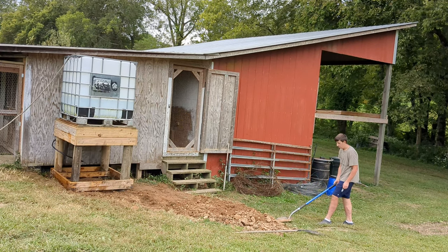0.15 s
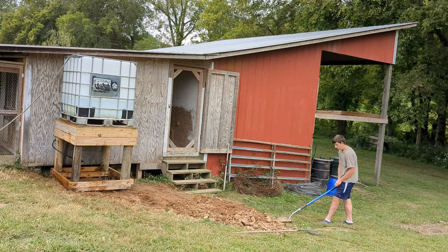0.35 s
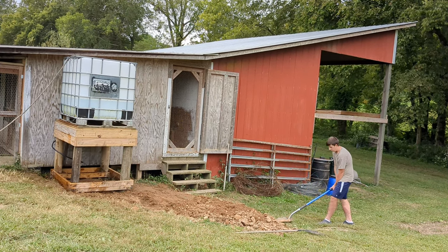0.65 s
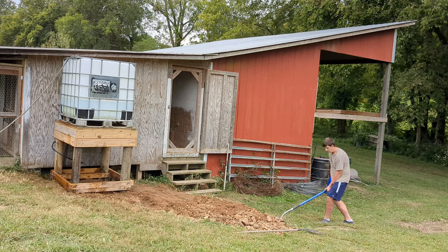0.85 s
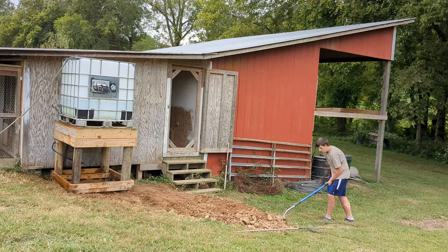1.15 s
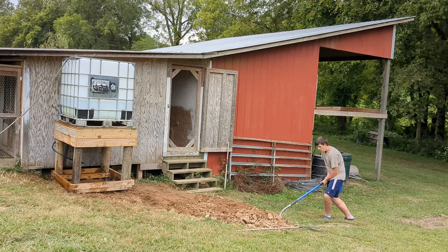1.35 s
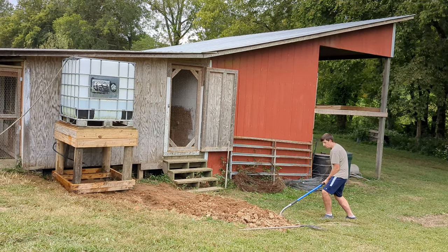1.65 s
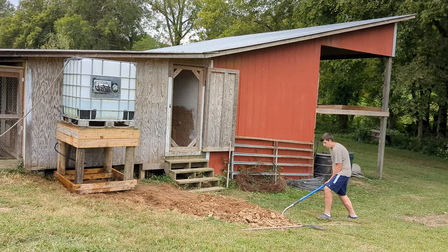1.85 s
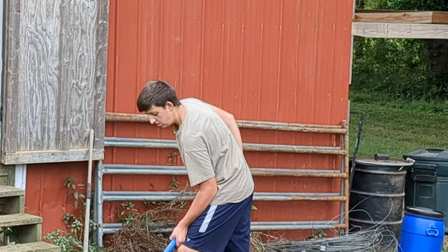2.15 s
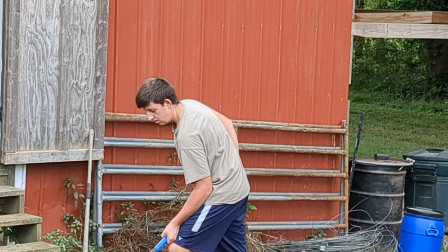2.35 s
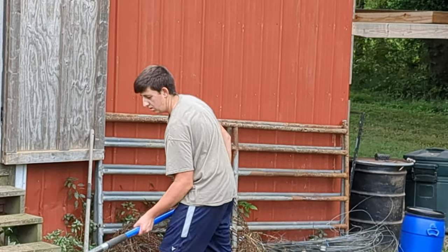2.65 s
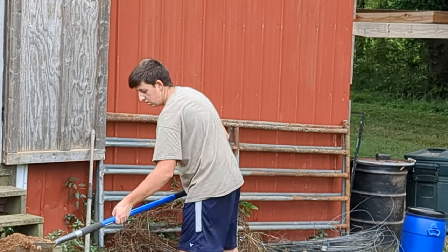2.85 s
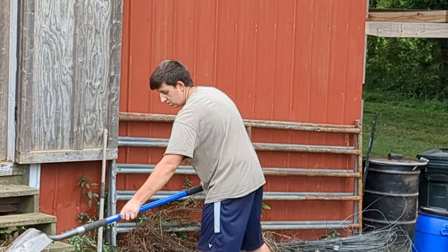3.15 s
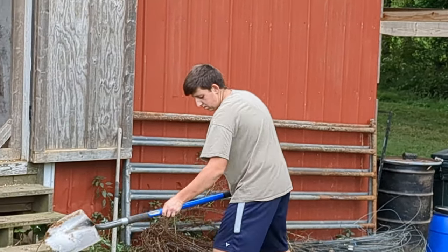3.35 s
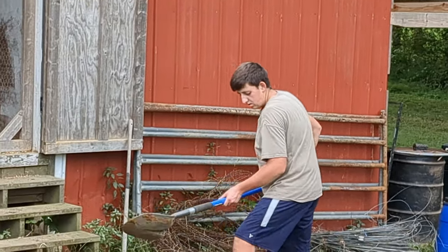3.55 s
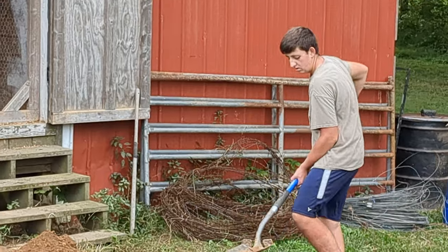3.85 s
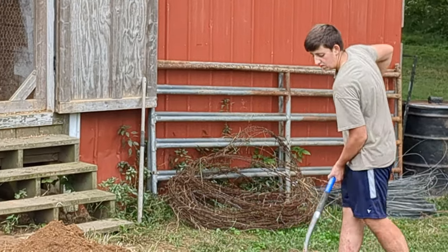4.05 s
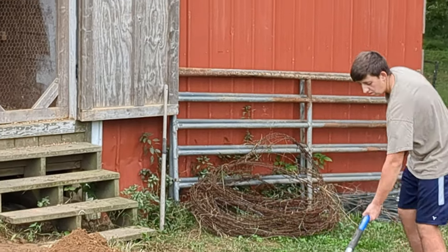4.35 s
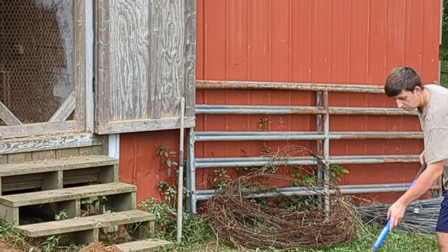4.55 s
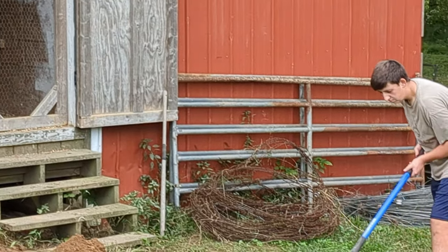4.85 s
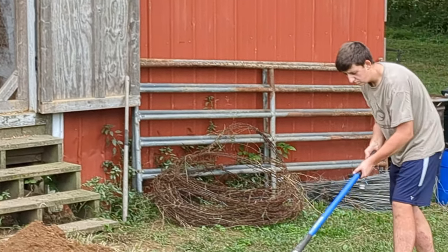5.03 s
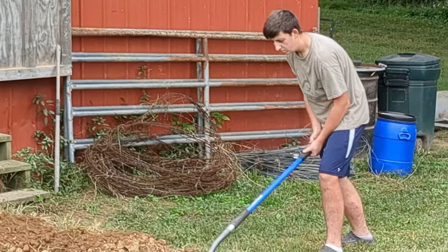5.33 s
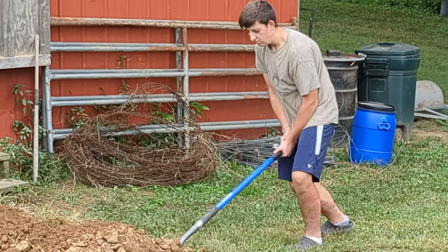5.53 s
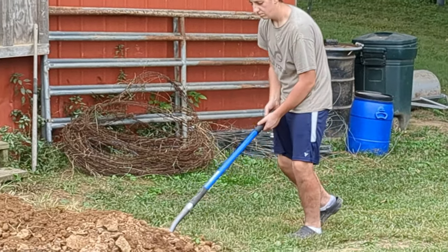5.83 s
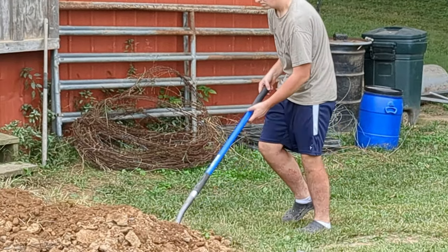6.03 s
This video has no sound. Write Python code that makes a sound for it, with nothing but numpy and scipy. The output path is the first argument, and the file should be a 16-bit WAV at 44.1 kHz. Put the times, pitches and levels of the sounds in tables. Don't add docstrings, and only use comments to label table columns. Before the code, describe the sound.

Two takes of shovelling in open air, picked up by a small, slightly dull camera microphone. The first is quiet and distant, with short gritty scrapes, small stone ticks, low traffic rumble and faint bird and hen notes. A momentary dropout follows, then a louder take with humming engine, pulsing insect chirps, loose soil hissing off the blade, one hard clank and several crunching scrapes.

```python
import sys
import numpy as np
from scipy import signal
from scipy.fft import rfft, irfft
from scipy.io import wavfile
from scipy.ndimage import uniform_filter1d

SR = 44100
rng = np.random.default_rng(int(sys.argv[2]) if len(sys.argv) > 2 else 0)


def materialize(psi):
    bounded = np.clip(np.atleast_2d(psi).T, -1, 1)
    quanta = np.round(bounded * 32767).astype(np.int16)
    wavfile.write(sys.argv[1], SR, quanta)


def rack_gain(trim_db):
    fader = np.asarray(trim_db, float)
    return 10 ** (fader / 20)


N = 272979
TIME = np.arange(N) / SR
GAP_S = (2.1077, 2.198)
SECOND = TIME > np.mean(GAP_S)


def per_take(first, second):
    return np.where(SECOND, second, first)


def evened(x):
    return x / np.sqrt(np.mean(x ** 2) + 1e-20)


def read(points, hz):
    f, value = np.transpose(points)
    return np.interp(np.log(hz + 1), np.log(f + 1), value)


def column(table, order):
    rows = np.array(table)
    return np.interp(TIME, rows[:, 0], rows[:, order])


def resonate(x, hz, width):
    turn = np.exp(2j * np.pi * np.cumsum(hz * np.ones(x.shape[-1])) / SR)
    r = np.exp(-np.pi * width / SR)
    return 2 * (turn * signal.lfilter([(1 - r) ** 2], [1, -2 * r, r * r], x / turn)).real


# frequency in Hz, likeness of left and right (1 = identical).
LIKENESS = [(60, 0.97), (130, 0.95), (290, 0.89), (640, 0.4), (1400, -0.12), (3080, -0.081), (6770, 0.097),
            (14900, -0.05)]
# frequency in Hz, left minus right in dB.
LEFT_TILT = [(60, 1.7), (130, 1.6), (290, 1.3), (640, 1.6), (1400, 2.9), (3080, 3.7), (6770, 8.3),
             (14900, 4.3)]


def field(spectrum, lo_hz=1, hi_hz=20000):
    hz = np.fft.rfftfreq(N, 1 / SR)
    left, other = rfft(rng.standard_normal((2, N)))
    same = np.clip(read(LIKENESS, hz), -1, 1)
    right = same * left + np.sqrt(1 - same ** 2) * other
    tilt = rack_gain(read(LEFT_TILT, hz) / 2)
    high_pass = (hz + 1) ** 4 / ((hz + 1) ** 4 + lo_hz ** 4)
    low_pass = hi_hz ** 4 / (hz ** 4 + hi_hz ** 4)
    pair = np.array([left * tilt, right / tilt])
    out = irfft(pair * rack_gain(read(spectrum, hz)) * high_pass * low_pass, N)
    return out / out.mean(0).std()


def flutter(rate_hz, depth_db):
    steps = rng.standard_normal(int(N / SR * 200) + 2)
    return rack_gain(depth_db * np.interp(TIME * min(rate_hz, 199), np.arange(len(steps)), steps))


def swell(s, rise, fall, db, round_top=1.12):
    away = np.where(TIME < s, (s - TIME) / max(rise, .005), (TIME - s) / max(fall, .005))
    return rack_gain(2 * (db - 20 * np.minimum(away, 5) ** round_top))


def ring(s, db, hz, t60, rise=0.00044):
    t60 = max(t60, .004)
    out, first = np.zeros(N), int(s * SR) + 1
    t = TIME[first:first + int(1.5 * t60 * SR)] - s
    onset = np.minimum(t / max(rise, .0001), 1)
    out[first:first + len(t)] = rack_gain(db - 60 * t / t60) * np.sin(2 * np.pi * hz * t) * onset
    return out


def place(x, left_db, lag=0, wet_db=-8):
    t = np.arange(3000) / SR
    sparse = rng.random((2, len(t))) < .05
    scatter = rng.standard_normal((2, len(t))) * sparse * rack_gain(-60 * t / 0.035)
    scatter *= rack_gain(wet_db) / np.linalg.norm(scatter[0])
    scatter[0, 0], scatter[1, lag] = 1, 1
    pan = rack_gain([[left_db / 2], [-left_db / 2]])
    return signal.oaconvolve(x[None], scatter * pan, axes=1)[:, :N]


def nearer_right_port(x):
    return np.array([np.pad(x, (17, 0))[:N], x]) * rack_gain([[.6], [-.6]])


# frequency in Hz, density in dB per Hz.
RUMBLE = [
    [(12, -75), (20, -17.5), (59, -14.5), (112, -9.5), (144, -18.5), (216, -23), (381, -25), (407, -32),
     (446, -23), (768, -32.5), (861, -32), (942, -32.5), (1660, -43), (4500, -78), (5850, -93),
     (9900, -120)],
    [(12, -44), (20, -14.5), (32, -12), (71, -6.5), (123, -3.5), (216, -18.5), (277, -17), (310, -20),
     (381, -23.5), (446, -23), (511, -25.5), (627, -24), (1700, -43.5), (4500, -60.5), (5850, -100),
     (9900, -120)],
]
# time in seconds, dB over its usual level.
TRAFFIC = [(0, 0.5), (.3, 0.5), (1.0, -1), (1.1, 0), (2.05, 1.5), (2.3, 0.5), (2.5, -4), (3.05, 2.5),
           (3.3, -1), (3.52, 4.5), (3.87, -2), (4.07, 4), (4.24, 1.5), (4.4, 3.5), (4.8, 0.5), (5.7, -1),
           (5.9, -0.5), (6.19, 0)]
BASS_DB = [-55, -46.5]
ROAR_DB = [-68, -53.5]


def rumble():
    bass = per_take(field(RUMBLE[0], hi_hz=147.0), field(RUMBLE[1], hi_hz=142))
    roar = per_take(field(RUMBLE[0], lo_hz=145), field(RUMBLE[1], lo_hz=146.6))
    traffic_db = column(TRAFFIC, order=1)
    sink_db = 0.42 * (TIME - per_take(1.05, 4.2))
    roar_db = per_take(*ROAR_DB) + .25 * traffic_db - sink_db
    return bass * rack_gain(per_take(*BASS_DB) + traffic_db) + roar * rack_gain(roar_db) * flutter(14, 1.5)


# start and end in seconds, pitch in Hz, width in Hz, level in dB.
DRONES = [(0, 0.967, 107.1, 3.2, -56.5), (0, 0.946, 71.4, 3.2, -62), (0, .6, 220.5, 2.6, -70.5),
          (1.11, 2.12, 113.3, 4.6, -62), (2.2, 4.42, 71.1, 2.6, -53.5), (2.216, 4.6, 96.6, 6.2, -57),
          (2.295, 5, 191.2, 2.4, -64), (2.75, 5.4, 323.2, 3, -65.5), (2.75, 3.75, 302, 3, -63),
          (4.0, 6.0, 276.4, 1.8, -66), (4.986, 5.899, 85.3, 5.3, -49.5), (4.19, 4.904, 883.6, 3.6, -66.5)]


def drones():
    out = np.zeros(N)
    for start, end, hz, width, db in DRONES:
        fade = np.clip(np.minimum(TIME - start, end - TIME) / 0.12 + .5, 0, 1)
        fuzz = evened(resonate(rng.standard_normal(N), hz, width))
        hum = evened(fuzz + 2.7 * np.sin(2 * np.pi * hz * TIME))
        out += rack_gain(db) * fade * hum
    return nearer_right_port(out)


# frequency in Hz, density in dB per Hz.
CHORUS = [(2060, -10.5), (3500, -11), (4290, -15.5), (5040, -14), (5460, -15.5), (5880, -16.5), (6740, -4),
          (7170, -1.5), (7530, -6), (9010, -15), (10100, -16.5), (13000, -14.5), (14100, -22.5),
          (14900, -11), (15300, -11)]
CHORUS_DB = [-80.5, -75]


def far_chorus():
    return field(CHORUS) * rack_gain(per_take(*CHORUS_DB) + per_take(0.6, 0.63)) * flutter(16, 1.0)


def buzzer():
    pulses = np.sin(np.pi * np.cumsum(69 * flutter(12, 0.8)) / SR) ** 8
    buzz = rng.standard_normal((2, N)) * pulses
    buzz = buzz[0] + 0.78 * buzz
    return evened(resonate(buzz, 7350, 1100)) * rack_gain(per_take(-88, -83) + np.array([[4.2], [-4.2]]))


TRILLS = [
    (5605, 260, -99, -95),
    (8170, 120, -89.5, -103),
]


def trills():
    out = np.zeros((2, N))
    for hz, width, first_db, second_db in TRILLS:
        trill = evened(resonate(rng.standard_normal((2, N)), hz, width)) * flutter(30, 1.0)
        out += trill * rack_gain(per_take(first_db, second_db) + np.array([[4.5], [0]]))
    return out


# loudest moment in seconds, level in dB.
CHIRPS = [(.21, -85), (.51, -87), (.8, -83.5), (1.03, -81.5), (1.42, -80), (1.69, -82.5), (2.01, -80),
          (2.36, -71.5), (2.64, -72.5), (2.95, -73), (3.29, -74.5), (3.6, -77), (3.931, -77), (4.25, -75.5),
          (4.52, -72), (4.85, -78), (5.14, -76.5), (5.51, -78), (5.86, -77), (6.15, -74.5)]
# frequency in Hz, width in Hz, level in dB.
WINGS = [
    (6940, 203, -1.5),
    (6700, 210, -7.5),
    (7340, 190, -11),
    (7600, 900, -19),
]


def near_chirper():
    wing_strokes = np.cumsum(np.where(TIME < 5.1, 45.3, 33.5)) / SR
    rasp = rng.standard_normal(N) * (0.12 + np.sin(np.pi * wing_strokes) ** 6)
    wing = evened(sum(rack_gain(db) * resonate(rasp, hz, width) for hz, width, db in WINGS))
    power = sum(swell(s, rise=0.19, fall=.14, db=db) for s, db in CHIRPS)
    return place(wing * np.sqrt(power), 13.5, lag=3, wet_db=1.5)


# start and length in seconds, first and last pitch in Hz, level in dB.
NOTES = [(.315, .05, 2950, 3370, -84), (.345, .11, 3385, 3270, -88.5), (.455, .075, 3240, 3150, -86),
         (.522, .035, 3200, 3200, -89), (.338, .045, 4950, 5060, -89), (.375, .085, 5070, 4900, -89),
         (.485, .05, 4790, 4750, -92), (1.772, .04, 3240, 3130, -88), (1.812, .025, 3130, 3180, -85),
         (1.83, .075, 3090, 3020, -83), (.785, .085, 990, 960, -70), (1.028, .03, 1070, 1140, -68),
         (1.63, .035, 1690, 1720, -76), (1.66, .07, 1370, 1310, -70.5), (1.715, .035, 1310, 1280, -76),
         (1.64, .11, 1800, 1880, -85)]


def birds():
    out = np.zeros(N)
    for s, length, first_hz, last_hz, db in NOTES:
        along = np.clip((TIME - s) / length, 0, 1)
        pitch = first_hz + (last_hz - first_hz) * np.sin(np.pi / 2 * along)
        hoarse = .22 if first_hz < 2000 else .15
        tone = np.sqrt(2) * np.sin(2 * np.pi * np.cumsum(pitch) / SR)
        breath = evened(resonate(rng.standard_normal(N), pitch, 170))
        arch = rack_gain(db - 14 * abs(2 * along - 1) ** 3) * (along > 0) * (along < 1)
        out += arch * ((1 - hoarse) * tone + hoarse * breath)
    return place(out, 3.2, lag=2, wet_db=-18)


# loudest moment, rise and fall in seconds,
# grit on steel in dB, sliding soil in dB above the grit.
STROKES = [(.9, .12, .08, -80, -18), (.968, .07, .06, -71.5, -11), (1.05, 0.017, 0.019, -83, -16),
           (1.25, .12, 0.14, -88, -24), (1.39, 0.064, .06, -77.5, -10), (1.428, 0.043, .035, -73.5, -9),
           (1.53, 0.17, 0.11, -77.5, -12), (1.7, .07, 0.17, -80.5, -15), (1.864, .1, .06, -82, -18),
           (2.43, .05, .04, -85, -14), (1.112, .012, 0.026, -79, -20), (.955, .03, .07, -77, -21),
           (6.135, 0.045, .08, -66, -19), (4.3, .4, 0.24, -75, -16), (3.675, .09, .04, -91, 14),
           (3.545, .05, .06, -91, 14), (3.86, .08, .1, -96, 14), (4.515, .02, 0.0303, -70, 2),
           (4.55, .03, .02, -74, 1), (5.1, .04, 0.0301, -69.5, -6), (3.499, 0.0093, .02, -73, 0),
           (3.6, 0.13, 0.14, -85.5, 12.5), (4.463, 0.029, 0.028, -56, -8),
           (4.5, 0.036, 0.063, -55.5, -11.5), (4.53, 0.073, 0.068, -65, -5.5), (4.58, .05, 0.11, -71, -10),
           (4.84, 0.074, 0.042, -66, -8.5), (5.065, 0.033, 0.095, -64, -8.5),
           (5.14, 0.079, .045, -62.5, -5.5), (5.452, 0.12, 0.16, -73.5, -6.5),
           (5.645, 0.16, 0.14, -71, -8.5), (5.84, .15, .1, -82.5, -1), (6.106, 0.045, 0.095, -60.5, -20),
           (6.19, 0.099, .05, -74, -2.5), (5.09, .05, .04, -69, -14), (6.085, .03, .03, -71, -26),
           (1.56, .06, .03, -81, -14), (.99, .03, .03, -76, -16), (1.47, .03, .04, -79, -10)]
# frequency in Hz, width in Hz, level in dB.
BLADE = [(634, 420, 6.5), (993, 200, 3.5), (1674, 420, 3), (2100, 370, 0.6), (2520, 1010, 4),
         (3137, 660, -2.5), (3700, 810, -9), (4850, 490, -14)]
# frequency in Hz, density in dB per Hz.
SOIL = [(3000, -41), (5000, -9), (6500, -5), (8000, 2), (10000, 0), (12500, 1.5), (14000, 0), (15500, -7)]


def strokes():
    push = np.array([swell(*row[:4], round_top=1.7) for row in STROKES])
    soil_db = np.array(STROKES)[:, 4]
    load_db = 0.44 * (-11.5 - soil_db)
    bare = np.sqrt(push.sum(0))
    loaded = np.sqrt(rack_gain(2 * load_db) @ push)
    sliding = np.sqrt(rack_gain(2 * soil_db) @ push)

    grit = rng.standard_normal((3, N)) * (rng.random((3, N)) < 9000 / SR)
    grit *= rack_gain(2.2 * np.minimum(rng.exponential(1, (3, N)), 4))
    grit = grit[0] + 1.3 * grit[1:]
    bend = flutter(25, .4)
    steel = np.zeros((2, N))
    for hz, width, db in BLADE:
        drive = loaded if 1400 < hz < 2400 else bare
        steel += rack_gain(db) * evened(resonate(grit, hz * bend, width)) * drive
    steel *= rack_gain(-8.5 + np.array([[3.4], [-3.4]])) * flutter(60, 1.5)
    soil = field(SOIL) * sliding * rack_gain(-1.0) * flutter(40, 1.8) * flutter(150, 1.5)
    return steel + soil


# time in seconds, ring level in dB, ring pitch in Hz,
# ring t60 in seconds, thud in dB above the ring.
KNOCKS = [(0.9388, -67, 1620, 0.016, -11), (0.9614, -70, 2200, 0.016, -9), (1.1039, -66.5, 1490, 0.02, 9.5),
          (1.3643, -72, 1640, 0.016, 6), (1.4197, -67, 1840, 0.016, -10), (3.1862, -68, 1802, 0.016, 5),
          (3.3303, -62.5, 1510, 0.016, 5), (3.4974, -59.5, 2570, 0.016, 8), (3.9105, -66, 1770, 0.014, 10),
          (4.4618, -49.5, 1770, 0.015, 1), (4.4952, -40.5, 3040, 0.012, -3), (4.7296, -64, 1560, 0.017, 13),
          (5.0464, -62, 2100, 0.016, 13), (5.6286, -70.5, 1879, 0.018, 21), (6.0404, -77, 1943, 0.016, 24),
          (6.0741, -59, 1507, 0.016, 7), (6.0931, -57, 1746, 0.016, -8), (6.1114, -57, 1940, 0.014, 4)]


def knocks():
    out = np.zeros(N)
    crack = resonate(rng.standard_normal(N), 3500, 5000)
    for s, db, hz, t60, thud_db in KNOCKS:
        out += ring(s, db + 3.0, hz, t60)
        out += ring(s, db - 5.0, hz * 1.18, t60 * 0.47)
        out += ring(s, db + thud_db - 0.5, 559, 0.042)
        out += crack * ring(s, db - 13, 60, 0.029)
    return out


# time in seconds, level in dB, pitch in Hz.
PEBBLES = [(.953, -70, 4410), (.953, -70, 2340), (.954, -73, 5790), (.967, -74, 3030), (.976, -73, 3720),
           (.985, -72, 2480), (.94, -67, 1790), (.972, -70, 1650), (.996, -70, 1600), (1.424, -69, 1790),
           (5.137, -62, 2600), (5.146, -63, 3200), (6.109, -55, 2070), (6.14, -60, 1600),
           (1.006, -72, 2150), (1.419, -71, 2760), (3.506, -69, 2620), (3.496, -72, 10060),
           (3.496, -68, 12270), (4.452, -57, 2630), (4.461, -62, 5930), (4.461, -64, 8960),
           (4.465, -51, 1660), (4.474, -52, 2900), (4.515, -63, 4820), (4.818, -61, 2790),
           (4.831, -66, 3970), (4.845, -64, 2760), (5.056, -64, 3300), (5.069, -62, 3250),
           (5.074, -63, 2620), (5.088, -63, 3050), (4.485, -60, 3000), (4.505, -58, 2700),
           (5.081, -63, 2480), (5.1, -62, 3030), (5.122, -55, 2890), (5.127, -65, 3860), (5.162, -65, 3100),
           (6.084, -59, 1650), (6.092, -59, 2480), (6.098, -57, 2470), (6.103, -53, 1515),
           (6.119, -59, 2070), (6.123, -62, 2760), (6.129, -58, 1900), (4.452, -64, 10200),
           (4.452, -65, 12800), (4.461, -58, 10600), (4.524, -63, 12300), (5.046, -60, 2140),
           (5.094, -62, 2100), (5.13, -62, 3300), (5.15, -63, 2000), (6.073, -62, 2750), (6.1, -57, 1750),
           (6.109, -62, 3150), (6.143, -64, 3650), (6.121, -58, 1450), (1.047, -76, 1900)]


def pebbles():
    return sum(ring(*pebble, t60=0.029, rise=0.0028) for pebble in PEBBLES)


# time in seconds, level in dB, pitch in Hz, t60 in seconds.
CLODS = [(.995, -52.5, 350, 0.033), (1.104, -51.5, 380, 0.022), (2.262, -56, 620, 0.15),
         (4.498, -42, 583, 0.057), (3.91, -50, 560, .03), (4.726, -51, 716, .03), (6.04, -52, 560, .03),
         (6.066, -63, 780, .04), (4.496, -47, 750, 0.018), (4.496, -50, 1250, 0.017),
         (1.11, -59, 650, 0.026), (5.107, -54, 589, 0.044), (5.9, -52, 560, 0.033), (1.104, -68, 716, 0.05),
         (3.497, -59, 3600, 0.025), (3.498, -62, 2300, .02), (3.498, -64, 4730, .012),
         (.964, -66, 2190, .09), (.95, -68, 1620, .09), (6.076, -59, 1700, .06), (6.14, -58, 1150, .04),
         (1.422, -69, 2250, .03), (4.825, -66, 2750, .04), (5.6, -63, 2400, .03), (5.89, -69, 3050, .02),
         (3.498, -68, 11500, .012)]


def clods():
    return sum(ring(*clod) for clod in CLODS)


# time in seconds, level in dB.
FIZZ = [(0, -99), (1.9, -92), (2.05, -85.5), (2.3, -83), (3.4, -85.5), (4.3, -84.5), (4.8, -99),
        (6.19, -99)]


def far_fizz():
    return field(SOIL, lo_hz=11400) * rack_gain(column(FIZZ, order=1)) * flutter(18, 1.3)


# time in seconds, shaft speed in Hz, fourth order in dB.
ENGINE = [(2.2, 30.1, -53.5), (2.71, 30.6, -47), (3.23, 30.8, -42.5), (3.6, 30.86, -48.5),
          (4.06, 30.9, -48.5), (4.46, 31.96, -49.5), (4.8, 32.29, -45), (5.14, 33.03, -42.5),
          (5.38, 34, -50), (5.59, 34.05, -43), (5.97, 34.14, -47.5), (6.19, 34.13, -45.5)]


def engine():
    shaft = 2 * np.pi * np.cumsum(column(ENGINE, order=1) * flutter(5.93, .008)) / SR
    out = rack_gain(column(ENGINE, order=2)) * np.sin(4 * shaft)
    out += rack_gain(-55.5 + 2.0 * (TIME < 3.4)) * np.sin(5 * shaft)
    out += rack_gain(-66) * (abs(TIME - 3.15) < .4) * np.sin(8 * shaft)
    return nearer_right_port(out * np.sqrt(2) * SECOND * flutter(15, 1.1))


def scene():
    far = rumble() + drones() + engine()
    grass = far_chorus() + buzzer() + trills() + near_chirper() + far_fizz()
    impacts = place(knocks() + pebbles() + clods(), 6.2, lag=2, wet_db=-10.0)
    return far + grass + birds() + strokes() + impacts


def thin_treble(x, under_db=-2.5, cut_db=-24, from_hz=2500):
    hz, t, z = signal.stft(x, SR, nperseg=1024)
    power = (abs(z) ** 2).mean(0)
    power = uniform_filter1d(uniform_filter1d(power, size=4, axis=0), size=4, axis=1)
    late = t > GAP_S[1]
    usual_first = np.median(power[:, ~late], axis=1)[:, None]
    usual_second = np.median(power[:, late], axis=1)[:, None]
    share = power / np.where(late, usual_second, usual_first)
    share /= np.minimum(uniform_filter1d(share, size=61, axis=0), 1)
    weak = 1 / (1 + np.minimum(share / rack_gain(2 * under_db), 100) ** 6)
    weak *= (abs(hz - 7400) > 1200)[:, None]
    gain = rack_gain(cut_db * weak * (hz > from_hz)[:, None])
    return signal.istft(z * gain, SR, nperseg=1024)[1][:, :N]


def top_cut(x):
    return signal.sosfilt(signal.butter(12, 15480, fs=SR, output="sos"), x)


# size in full scale, swing in Hz,
# decay in seconds, onset in seconds.
SWING = [
    (-.022, 1.9, .17, .0003),
    (-.021, 1.25, .17, .04),
]


def record(dry):
    dry = thin_treble(dry)
    after = TIME - GAP_S[1]
    since = np.maximum(after, 0)
    low = signal.sosfilt(signal.butter(1, 1100, fs=SR, output="sos"), dry)
    treble = per_take(1, np.clip(after / 0.21, 0, 1) ** 0.61)
    wake = per_take(TIME < GAP_S[0], np.clip(after / np.array([[.0003], [.07]]), 0, 1))
    size, hz, decay, onset = np.transpose(SWING)[:, :, None]
    swing = size * np.cos(2 * np.pi * hz * since) * np.exp(-since / decay)
    offset = swing * (1 - np.exp(-since / onset))
    return top_cut((low + (dry - low) * treble) * wake + offset)


dry = scene()
out = record(dry)
materialize(out)
```